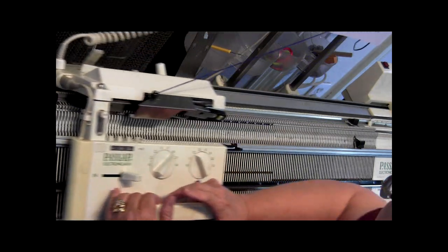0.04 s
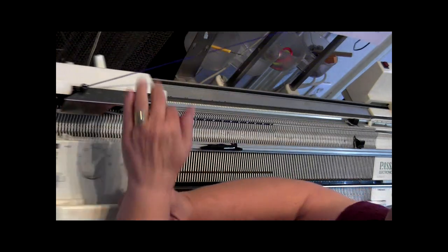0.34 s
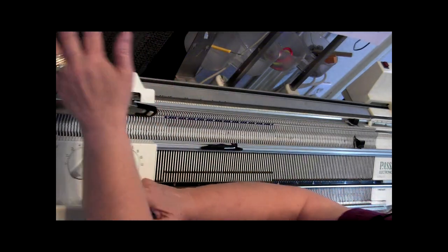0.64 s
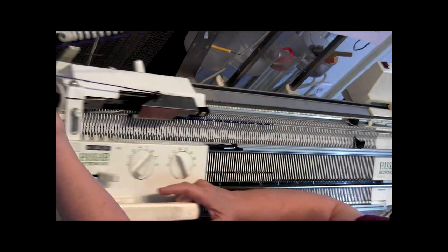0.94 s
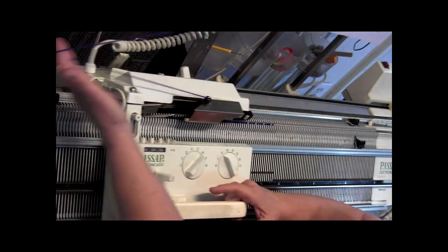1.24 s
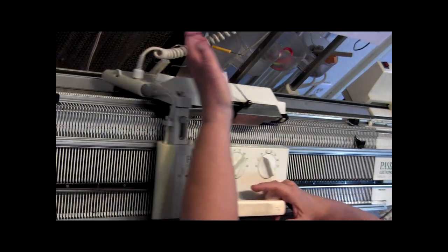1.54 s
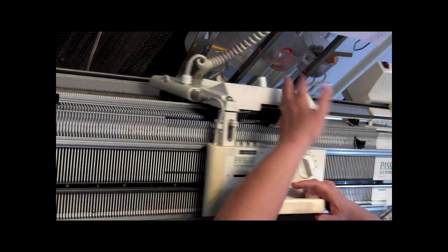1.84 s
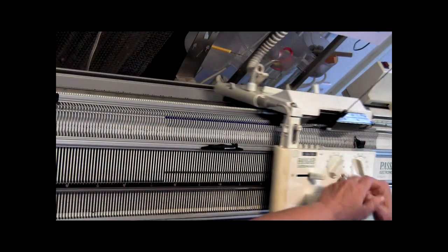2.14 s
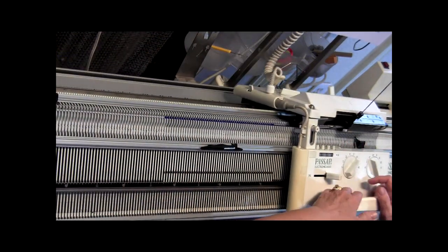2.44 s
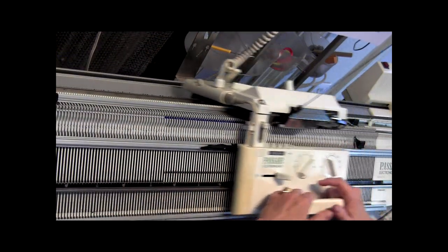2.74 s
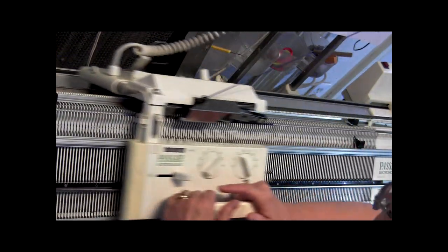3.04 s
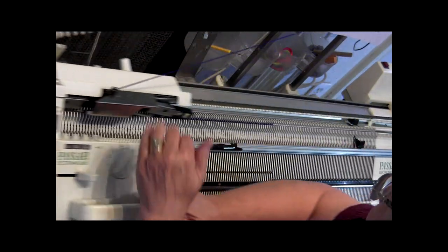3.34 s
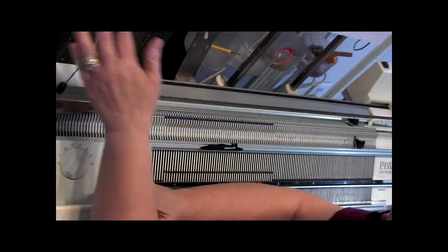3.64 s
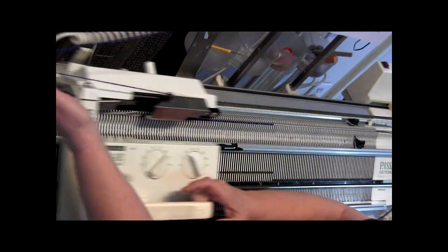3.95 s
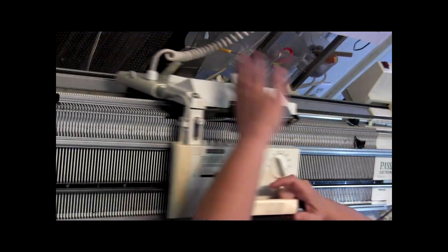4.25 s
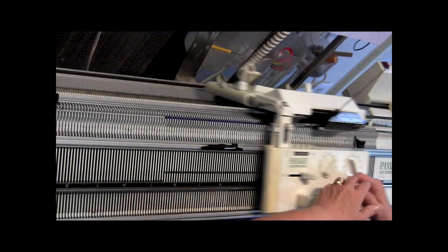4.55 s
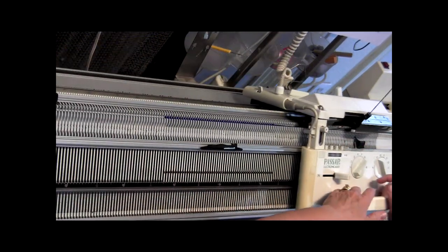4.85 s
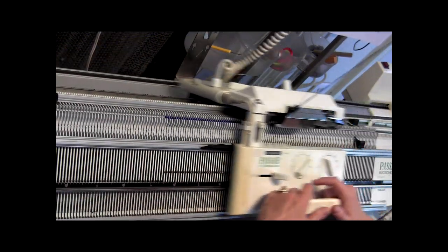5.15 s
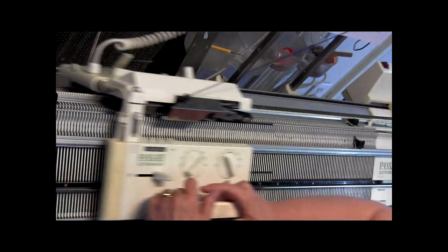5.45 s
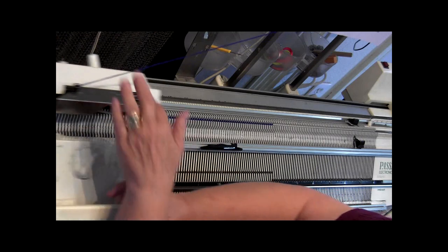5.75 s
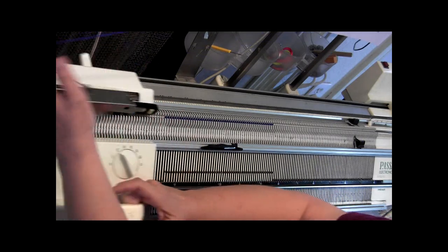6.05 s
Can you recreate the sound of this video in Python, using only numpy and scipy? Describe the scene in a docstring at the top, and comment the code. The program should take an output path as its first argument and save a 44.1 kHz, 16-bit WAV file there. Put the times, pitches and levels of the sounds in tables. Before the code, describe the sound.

In a small room with low hum and hiss, a close knitting machine rasps and ticks as its carriage slides over the needle beds. A gentle pass and a longer, uneven one are followed by three firmer strokes. Each row ends with sharp metal clacks, a dull knock and a short scrape. Gusts rumble on the microphone after the second and fourth passes, briefly ducking the other sounds.

```python
"""A knitting machine, close to the microphone in a small room, its carriage pushed to and fro by hand.
The cams flick needle after needle in a bright rasp, the steel beds resound, and the carriage groans where
it binds. At the row ends cams and levers clack, the frame knocks and the carriage scrapes as it eases back.
Low mains hum and room hiss lie behind. Now and then a draught buffets the microphone, and the stronger
gusts make the limiter duck everything."""
import sys
import numpy as np
from scipy import signal
from scipy.fft import rfft, irfft, next_fast_len
from scipy.io import wavfile
from scipy.ndimage import uniform_filter1d

SR = 44100
rng = np.random.default_rng(int(sys.argv[2]) if len(sys.argv) > 2 else 0)


def to_wav(sig):
    """Store sig (one row per channel, or 1-D mono) as 16-bit WAV at the path in sys.argv[1].

    Samples outside -1..1 are clipped; the rate is SR.
    """
    pcm = np.clip(np.atleast_2d(sig), -1, 1) * 32767
    pcm = np.round(pcm).astype(np.int16)
    wavfile.write(sys.argv[1], SR, pcm.T)  # frames by channels


N = 269522
T = np.arange(N) / SR

# Spectral shapes: f/Hz, relative level/dB
RASP_SPECTRUM = [(1200, -15), (2000, -5.5), (2500, -4.5), (3300, -2.5), (4450, -2.5), (5000, -5),
                 (5900, -3.5), (6800, -4.5), (8200, -2), (9700, -1.5), (10800, 0), (12000, -2.5),
                 (13500, -14), (16000, -20)]  # steel on steel
SIZZLE_SPECTRUM = [(7000, -9), (11000, -5), (12600, -5), (14000, -6), (16000, -31)]  # the fine top of the rasp
CLICK_SPECTRUM = [(3000, -6.5), (5000, 0.5), (7200, 4.5), (9000, 4), (11000, 5.5), (13000, 1), (16000, -15)]  # a sharp steel contact
SWIRL_SPECTRUM = [(10, -10.5), (22, 14), (45, 12), (70, -3), (100, -4.5), (140, -13), (250, -48.5),
                  (600, -85.5)]  # slow air on the microphone
EDDY_SPECTRUM = [(30, -43.5), (65, 11), (95, -4.5), (130, -10.5), (200, -32.5), (500, -80)]  # quicker eddies
FLUTTER_SPECTRUM = [(60, -13.5), (120, 2), (170, 0.5), (250, -7.5), (400, -21.5), (800, -43.5),
                    (2500, -123)]  # light flutter of the air
HISS_SPECTRUM = [(30, 34.5), (80, 12), (170, -3), (300, 10), (450, 7.5), (800, 7), (1500, 2), (3000, -0.5),
                 (6000, -5), (11000, -6.5), (16000, -13)]  # room tone

# Resonances: f/Hz, width/Hz, relative level/dB
PLATE_MODES = [(2350, 350, 2), (2924, 163, 5.5), (3370, 145, 5), (4090, 79, 2), (4960, 86, -3),
               (5600, 90, 2), (6080, 50, 3), (6850, 380, -6)]  # steel carriage plate
LATCH_MODES = [(4460, 500, -2), (6300, 800, -26), (9240, 630, -10), (10460, 1060, 16), (12500, 1000, -2)]  # needle latches
BED_MODES = [(583, 80, 0.5), (732, 126, 2.5), (897, 320, -0.5)]  # boom of the needle beds
SHELL_MODES = [(1046, 216, -4.5), (1364, 235, 5), (1540, 465, 6.5), (1690, 860, -3)]  # plastic shell
RAIL_MODES = [(335, 26, 0)]  # rails
FRAME_MODES = [(840, 76, -2.5), (1129, 71, 0.5), (1320, 130, -1.5), (1660, 225, -1.5), (2750, 430, -15.5)]  # frame
STEEL_MODES = [(709, 8, 0), (1596, 17, 4), (2590, 17, 1), (6000, 11, 1), (6140, 100, -10.5), (7700, 22, -4),
               (9700, 16, 5.5), (11040, 99, 5.5)]  # long, thin ring of the beds

# How hard the hand pushes, one curve a pass: t/s, level/dB
PUSH_CURVES = [
    [(0, -33), (.15, -34.5), (.27, -34), (.36, -46.5), (.52, -52.5)],
    [(.96, -40), (1.08, -36), (1.21, -27.5), (1.29, -36), (1.52, -26), (1.65, -32), (1.97, -24.5),
     (2.05, -29), (2.16, -27), (2.21, -43), (2.41, -46)],
    [(2.79, -41), (2.9, -23.5), (3.09, -19.5), (3.29, -29.5), (3.41, -28.5), (3.46, -42), (3.56, -54)],
    [(3.94, -37), (4.03, -32.5), (4.13, -19.5), (4.24, -22), (4.44, -21), (4.53, -27), (4.62, -27),
     (4.72, -44), (4.82, -45)],
    [(5.16, -43), (5.28, -22), (5.4, -19), (5.49, -22.5), (5.6, -32.5), (5.72, -32), (5.82, -51.5)],
]
# Carriage passes: start and end place (0 left, 1 right); bed, shell, sizzle and latch level/dB
# against the push; f/Hz of the gliding bed resonance at mid-bed
CARRIAGE_PASSES = [(0.012, 0.76, -8, -5, -11, -9.5, 603), (0.18, 0.71, -11, -5, -15, -13.5, 790),
                   (0.67, 0.3, -13.5, -7.5, -18, -4, 830), (0.3, 0.92, -6, -6.5, -7, -5.5, 718),
                   (0.74, 0.24, -8.5, -6.5, -10, -6, 842)]
# Gusts on the microphone: t/s at full strength, hold/s, swirl level/dB, eddy level/dB against the swirl
AIR_GUSTS = [(0, 0.024, -10, -6), (0.061, 0.043, -12, -30), (2.146, 0.048, -6, -5.5),
             (2.326, 0.057, -6, -1.5), (2.409, 0.15, 3, -5.5), (2.611, 0.079, -0.5, -5),
             (2.732, 0.0084, -5, -19), (4.818, 0.21, 6, -6.5), (5.006, .09, -1.5, -4.5),
             (5.186, 0.025, -8, -9), (5.307, 0.2, -14, -11.5), (5.442, 0.0092, -4, -22),
             (5.61, 0.027, -14.5, -30), (5.7, 0.016, -15, -31)]
# Short dull bumps of air: centre t/s, f/Hz, level/dB, half length/s
AIR_BUMPS = [(0.816, 21.7, -12.5, 0.033), (1.315, 216, -11, 0.0032), (1.37, 32.4, 8.5, 0.015),
             (2.115, 237, -14, 0.0037), (2.157, 32.5, 2.5, 0.011), (2.27, 200, -12, .017)]
# Where the carriage binds: centre t/s, half length/s, level/dB, f/Hz
BINDING_GROANS = [(0.17, 0.045, -32.5, 660), (1.231, 0.017, -26, 860), (1.317, 0.055, -32, 636),
                  (1.51, 0.085, -37.5, 517), (3.113, 0.077, -27.5, 1500), (4.14, 0.088, -32, 750),
                  (5.356, 0.056, -30.5, 950)]
# Blows of cams and levers: t/s, click level/dB, clank level/dB, ring f/Hz, chatter length/s
LEVER_CLACKS = [(0.2232, -22, -24, 10700, 0.007), (.252, -21, -19.5, 9900, 0.0057),
                (.5923, -26.5, -27.5, 6170, .004), (.7588, -26.5, -54, 7200, 0.005),
                (0.8471, -16, -29, 8850, 0.0099), (.856, -23, -28, 10400, 0.013),
                (0.88, -9.5, -19.5, 10400, 0.0081), (0.9121, -11.5, -20, 11300, 0.009),
                (0.9708, -11, -21, 8800, 0.0013), (1.035, -10.5, -22, 9900, 0.0018),
                (1.3422, -25, -28, 12200, 0.0036), (1.8201, -8.5, -18.5, 9460, 0.0043),
                (2.139, -15.5, -10.5, 7950, 0.0029), (2.159, -33, -21.5, 8000, 0.0075),
                (2.2086, -19.5, -29.5, 8200, 0.0099), (2.5154, -23, -24.5, 6800, 0.0036),
                (2.59, -18.5, -34, 6800, 0.0033), (2.6084, -9, -26, 6900, 0.0032),
                (2.701, -10, -12, 10000, 0.012), (3.3715, -15.5, -19, 10400, 0.0047),
                (3.3967, -21, -17, 11000, 0.0029), (3.6477, -24, -25.5, 7080, 0.0036),
                (3.867, -14, -29, 10200, 0.0072), (3.875, -19.5, -25, 9100, 0.012),
                (3.8925, -9.5, -15, 9900, 0.0098), (3.9043, -8.5, -12, 10000, 0.0031),
                (3.964, -24, -28, 9100, 0.0049), (4.0103, -17.5, -24.5, 11800, 0.01),
                (4.2696, -7, -22, 12200, 0.0036), (4.3116, -8, -27, 10700, 0.0037),
                (4.392, -13, -37, 5450, 0.007), (4.6078, -18, -21, 9400, 0.006),
                (4.664, -13.5, -21, 5500, 0.0052), (4.807, -22, -21.5, 5900, 0.0061),
                (5.0673, -6, -9.5, 11000, 0.0052), (5.0848, -9, -15, 5660, 0.0038),
                (5.1882, -24.5, -41, 10500, 0.0081), (5.4866, -9, -33, 10900, 0.0058),
                (5.7593, -26, -27, 6100, 0.0031), (5.93, -24, -22.5, 6100, 0.003),
                (6.0958, -20.5, -29, 11400, 0.002)]
# Dull knocks of the frame at the row ends: t/s, level/dB
FRAME_KNOCKS = [(.6728, -30), (3.7222, -22), (4.729, -24.5), (6.0182, -23)]
# The carriage eased back before a pass: centre t/s, half length/s, level/dB, squeak f/Hz
EASING_SCRAPES = [(0.87, 0.077, -30.5, 5570), (2.677, 0.049, -21.5, 7200), (3.886, .08, -28, 10800),
                  (5.034, 0.06, -23.5, 5800)]

FIRM_PUSH_DB = -21  # reference push for carriage speed and latch level


def from_db(db):
    """Decibels to gain."""
    return 10 ** (np.asarray(db) / 20)


def unit_power(x):
    """Scale to a mean square of one."""
    return x / np.sqrt(np.mean(x ** 2) + 1e-20)


def evened(x, span_s):
    """Unit power over every stretch of this length; finer grain stays."""
    return x / np.sqrt(np.abs(uniform_filter1d(x ** 2, max(int(span_s * SR), 8))) + 1e-12)


def in_time(rows):
    """Each column of a curve at every sample."""
    times, *columns = np.transpose(rows)
    return [np.interp(T, times, column) for column in columns]


def swell(centre_s, half_s):
    """A bell-shaped rise and fall."""
    return np.exp(-((T - centre_s) / half_s) ** 2)


def coloured(x, spectrum):
    """Causal (minimum-phase) filter with this spectrum; white noise keeps its power."""
    size = 2 * next_fast_len(N // 2 + SR // 4)
    hz, db = np.transpose(spectrum)
    bin_hz = np.arange(size // 2 + 1) * SR / size
    gain = unit_power(from_db(np.interp(np.log(bin_hz + 1), np.log(hz), db)))
    cepstrum = irfft(np.log(gain))
    cepstrum[1:size // 2] *= 2
    cepstrum[size // 2 + 1:] = 0
    return irfft(rfft(x, size) * np.exp(rfft(cepstrum)))[:N]


def resonate(x, modes):
    """Parallel resonances with steep outer skirts; white noise keeps its power."""
    pulse, response = signal.unit_impulse(SR // 8), 0
    for k, (hz, width, db) in enumerate(modes):
        radius = np.exp(-np.pi * width / SR)
        feedback = [1, -2 * radius * np.cos(2 * np.pi * hz / SR), radius * radius]
        ring = signal.lfilter([1 - radius, 0, radius - 1], feedback, pulse)
        response = response + (-1) ** k * from_db(db) * ring
    band_hz = [modes[0][0] / 2, min(modes[-1][0] * 2, SR / 2 - 1000)]
    response = signal.sosfilt(signal.butter(2, band_hz, "band", fs=SR, output="sos"), response)
    return signal.fftconvolve(x, response / np.linalg.norm(response))[:N]


def tuned(x, hz, width_hz):
    """One resonance whose centre may glide; white noise keeps its power."""
    carrier = np.exp(2j * np.pi * np.cumsum(hz * np.ones(len(x))) / SR)
    narrow = signal.sosfilt(signal.butter(2, width_hz / 2, fs=SR, output="sos"), x / carrier)
    return np.real(carrier * narrow) * np.sqrt(2 * SR / width_hz)


def uneven(spread_db):
    """A random gain at every sample."""
    return from_db(spread_db * np.clip(rng.standard_normal(N), -2, 2))


def grit():
    """Countless tiny contacts of uneven size."""
    return unit_power(rng.standard_normal(N) * uneven(spread_db=3))


def touch_power(cycle, t60, spread_db, lag=0):
    """One touch a cycle, each with its own strength, dying quickly; mean power about 1."""
    touches = np.diff(np.floor(cycle - lag), prepend=np.floor(cycle[0] - lag)) > 0
    decay = from_db(-60 / (t60 * SR)) ** 2
    power = signal.lfilter([1], [1, -decay], touches * uneven(spread_db) ** 2 + 1e-12)
    return power / (uniform_filter1d(power, SR // 12) + 1e-9)


def travel(firm_needles_per_s=160, doubling_db=13):
    """The carriage's motion and each pass's colour at every sample; a harder push drives it faster."""
    push_db, = in_time(np.vstack(PUSH_CURVES))
    speed = firm_needles_per_s * 2 ** ((push_db - FIRM_PUSH_DB) / doubling_db)
    moving, place, colours = np.zeros(N), np.zeros(N), []
    for curve, (start, end, *colour) in zip(PUSH_CURVES, CARRIAGE_PASSES):
        start_s, end_s = curve[0][0], curve[-1][0]
        during = (T >= start_s) & (T <= end_s)
        moving[during] = 1
        place[during] = start + (end - start) * np.cumsum(speed[during]) / np.sum(speed[during])
        colours += [(start_s, *colour), (end_s, *colour)]
    return push_db, speed, place, uniform_filter1d(moving, SR // 30), in_time(colours)


def carriage(bed_fade_db=10.5, sizzle_fade_db=17, latch_fade_db=12.5, bed_rise_hz=100):
    """Needle butts hit the cams, their latches flick shut just after, and the rails rub throughout."""
    push_db, speed, place, moving, (bed_db, shell_db, sizzle_db, latch_db, bed_hz) = travel()
    # from left to right the bed booms less and rings higher, and sizzle and latches fade
    rightward = place - 0.5
    bed_hz += bed_rise_hz * rightward
    bed_db += push_db - bed_fade_db * rightward
    sizzle_db += push_db - sizzle_fade_db * rightward
    # a latch shuts by its own small weight, so it follows the push only in part
    latch_db += FIRM_PUSH_DB + 0.92 * (push_db - FIRM_PUSH_DB) - latch_fade_db * rightward

    cycle = np.cumsum(speed) / SR
    butts = touch_power(cycle, t60=0.034, spread_db=3)
    latches = touch_power(cycle, t60=0.0059, spread_db=2.5, lag=0.12)
    steel_rub, body_rub = 1.0, 0.71  # steady sliding power against that of the butts
    rasp_envelope = evened(np.sqrt(butts + steel_rub), span_s=0.084)
    # the even spacing of the needles puts a faint gliding buzz into the heavy parts
    buzz = evened(np.diff(np.floor(cycle), prepend=0), span_s=0.1)
    body_drive = evened(np.sqrt(butts + body_rub) * grit(), span_s=0.061)
    body_drive = evened(body_drive + from_db(-5) * buzz, span_s=0.051)

    steel = from_db(push_db + 0.5) * coloured(rasp_envelope * grit(), RASP_SPECTRUM)
    steel += from_db(push_db - 13) * resonate(rasp_envelope * grit(), PLATE_MODES)
    steel += from_db(sizzle_db + 3) * coloured(rasp_envelope * grit(), SIZZLE_SPECTRUM)
    steel += from_db(latch_db) * resonate(np.sqrt(latches) * grit(), LATCH_MODES)
    # needles catch and tick; they stand out most when the carriage creeps
    ticks = np.sqrt(touch_power(cycle, t60=0.0037, spread_db=0))
    steel += from_db(0.69 * push_db - 19) * coloured(ticks * grit(), CLICK_SPECTRUM)

    body = from_db(bed_db) * resonate(body_drive, BED_MODES)
    body += from_db(bed_db - 2) * tuned(rasp_envelope * grit(), bed_hz, width_hz=170)
    body += from_db(push_db + shell_db + 1) * resonate(body_drive, SHELL_MODES)
    # the rails drone under the carriage's weight, only a little louder for a harder push
    body += from_db(0.51 * push_db - 35) * resonate(body_drive, RAIL_MODES)
    return moving * (steel + body + groans(rasp_envelope * grit()))


def draught(rise_db_per_s=589, fall_db_per_s=306, calm_swirl_db=-43, calm_flutter_db=-47):
    """Air right on the microphone: gusts of slow swirl, quicker eddies and flutter, and a few bumps."""
    swirl, eddies = np.zeros((2, N))
    for at_s, hold_s, db, eddy_db in AIR_GUSTS:
        before_s, after_s = np.maximum(at_s - T, 0), np.maximum(T - at_s - hold_s, 0)
        gust_db = db - rise_db_per_s * before_s - fall_db_per_s * after_s
        swirl = np.maximum(swirl, from_db(gust_db))
        eddies = np.maximum(eddies, from_db(gust_db + eddy_db))
    swirl = np.hypot(swirl, from_db(calm_swirl_db))
    flutter = np.hypot(eddies * from_db(-14), from_db(calm_flutter_db))
    air = swirl * evened(coloured(rng.standard_normal(N), SWIRL_SPECTRUM), span_s=0.0318)
    air += eddies * evened(coloured(rng.standard_normal(N), EDDY_SPECTRUM), span_s=0.0272)
    air += flutter * evened(coloured(rng.standard_normal(N), FLUTTER_SPECTRUM), span_s=0.045)
    for at_s, hz, db, half_s in AIR_BUMPS:
        air -= from_db(db) * swell(at_s, half_s) * np.sin(2 * np.pi * hz * (T - at_s))
    return air


def room_tone(hum_hz=60, hum_db=-36.5, hiss_db=-30.5):
    """Mains hum and steady hiss behind the machine."""
    hum = from_db(hum_db) * unit_power(np.sin(2 * np.pi * hum_hz * T))
    return hum + from_db(hiss_db) * coloured(rng.standard_normal(N), HISS_SPECTRUM)


def groans(drive, q=4.2):
    """Where the carriage binds, a part under strain resounds to the needles for a moment."""
    return sum(from_db(db) * swell(at_s, half_s) * tuned(drive, hz, hz / q)
               for at_s, half_s, db, hz in BINDING_GROANS)


def chatter(at_s, length_s, tail_db=-17, tail_t60=0.12, rise_s=0.0016):
    """One blow on loose parts, a burst and a weak settling rattle: its span and four sets of contacts."""
    span = slice(int(at_s * SR), int(at_s * SR) + SR // 5)
    age = T[span] - T[span][0]
    contacts = rng.standard_normal((4, SR // 5))[:, :len(age)] * (1 - np.exp(-age / rise_s))
    burst = np.exp(-(age / length_s) ** 2)
    rattle = from_db(tail_db - 60 * age / tail_t60)
    return span, contacts * np.hypot(burst, rattle)


def clacks():
    """Each blow of a cam or lever clicks and rings the plate, the frame and the struck part."""
    click, clank, frame, ring = np.zeros((4, N))
    for at_s, click_db, clank_db, hz, length_s in LEVER_CLACKS:
        span, contacts = chatter(at_s, length_s)
        click[span] += from_db(click_db) * contacts[0]
        clank[span] += from_db(clank_db) * contacts[1]
        frame[span] += from_db(clank_db - 2.5) * contacts[2]
        ring[span] += from_db(click_db - 3.5) * tuned(contacts[3], hz, width_hz=520)
    steel = coloured(click, CLICK_SPECTRUM) + resonate(clank, PLATE_MODES) + ring
    return steel + resonate(frame, FRAME_MODES)


def knocks(plate_db=-11, click_db=-13):
    """A knock at the row end goes mostly into the frame, with little steel in it."""
    blows = np.zeros((4, N))
    for at_s, db in FRAME_KNOCKS:
        span, contacts = chatter(at_s, length_s=0.007)
        blows[:, span] += from_db(db) * contacts
    plate = from_db(plate_db) * resonate(blows[1], PLATE_MODES)
    click = from_db(click_db) * coloured(blows[2], CLICK_SPECTRUM)
    return resonate(blows[0], FRAME_MODES) + plate + click


def scrapes(slips_per_s=70, squeak_db=-6):
    """Steel slips slowly over steel: a short swell of rasp with a thin squeak at its height."""
    slips = np.sqrt(touch_power(T * slips_per_s, t60=0.06, spread_db=2.5))
    rasp = coloured(slips * grit(), RASP_SPECTRUM)
    sound = np.zeros(N)
    for at_s, half_s, db, hz in EASING_SCRAPES:
        squeak = from_db(squeak_db) * swell(at_s, half_s / 2) * tuned(slips * grit(), hz, width_hz=600)
        sound += from_db(db) * swell(at_s, half_s) * (rasp + squeak)
    return sound


def machine(ring_db=-15):
    """Everything that happens on the beds also sets their steel ringing."""
    sound = carriage() + scrapes() + clacks() + knocks()
    return sound + from_db(ring_db) * resonate(sound, STEEL_MODES)


def small_room(x, t60=0.1, wet_db=-14, first_echo_s=0.00302, wall_hz=7000):
    """Near walls send a short, slightly dull tail back to the microphone."""
    age = T[:SR // 2]
    tail = rng.standard_normal(len(age)) * from_db(-60 * age / t60) * (age > first_echo_s)
    tail = signal.sosfilt(signal.butter(1, wall_hz, fs=SR, output="sos"), tail / np.linalg.norm(tail))
    return x + from_db(wet_db) * signal.fftconvolve(x, tail)[:N]


def limiter(x, ceiling_db=-3.5, recovery_db_per_s=82):
    """The recorder ducks everything at once under a strong gust and recovers at a steady rate."""
    window = SR // 200
    level_db = 10 * np.log10(np.abs(uniform_filter1d(x ** 2, window)) + 1e-12)
    excess_db = np.maximum(level_db - ceiling_db, 0)
    recovery_db = recovery_db_per_s * T
    cut_db = np.maximum.accumulate(excess_db + recovery_db, axis=-1) - recovery_db
    return x * from_db(-uniform_filter1d(uniform_filter1d(cut_db, window), window))


def scene():
    """One microphone: the machine close by, the air on the capsule, the room behind."""
    return (small_room(machine()) + draught() + room_tone())[None]


def record(dry):
    """At the recorder the limiter acts, full scale bounds the peaks and the top is cut at 16 kHz."""
    lowpass = signal.ellip(10, 0.1, 80, 16000, fs=SR, output="sos")
    return signal.sosfilt(lowpass, np.clip(limiter(dry), -1, 1))


dry = scene()
out = record(dry)
to_wav(out)
```